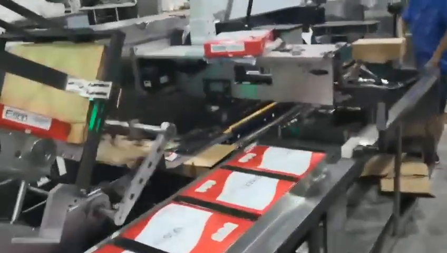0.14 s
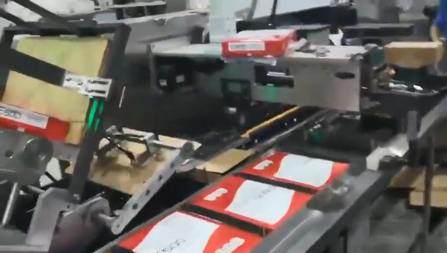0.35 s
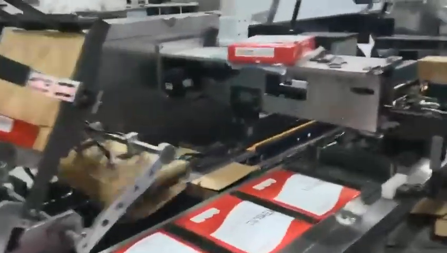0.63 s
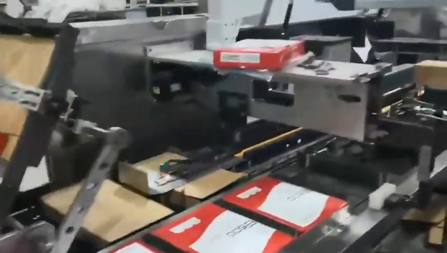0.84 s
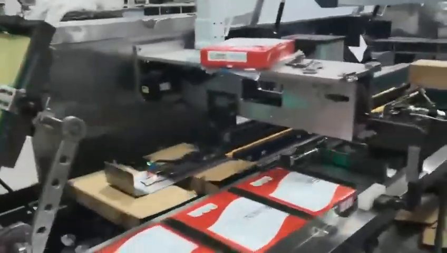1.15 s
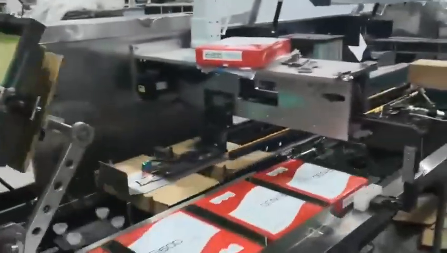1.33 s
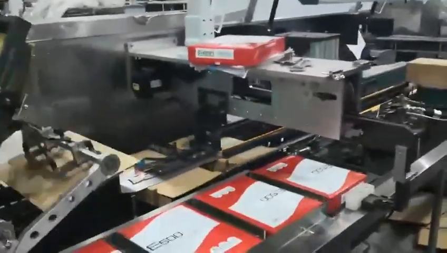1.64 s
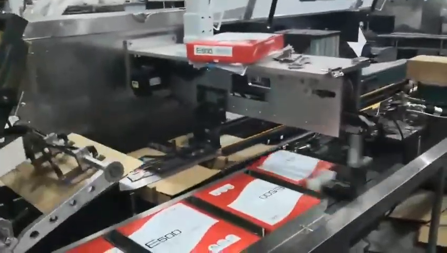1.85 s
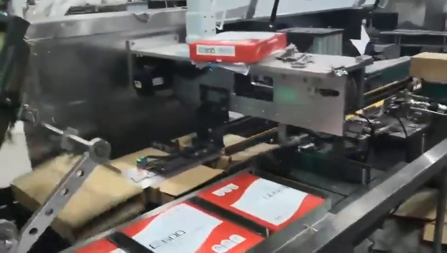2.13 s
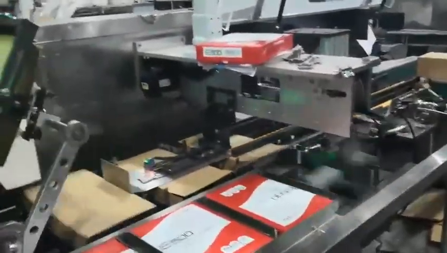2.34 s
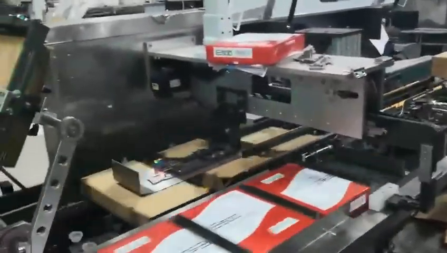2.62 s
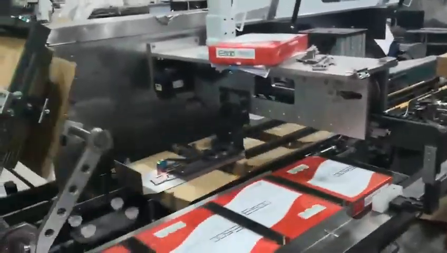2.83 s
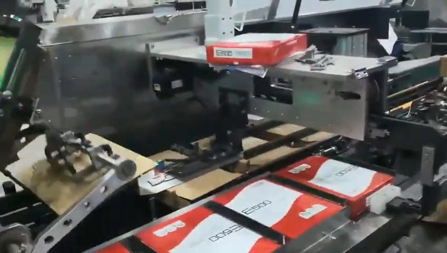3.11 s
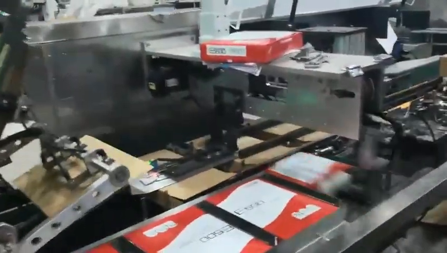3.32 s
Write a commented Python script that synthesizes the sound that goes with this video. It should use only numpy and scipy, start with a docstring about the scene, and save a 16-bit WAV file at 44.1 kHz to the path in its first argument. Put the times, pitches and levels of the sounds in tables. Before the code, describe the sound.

A carton packaging machine cycles close by over a steady factory hum. Whistling air bursts, each with a metallic knock, come at about 0.1, 1.6 and 3 seconds. Ringing lever clacks and low thumps follow from 0.6 to 1.1 seconds, from 2 to 2.7, and at 3.4. The conveyor rumbles louder while a carton scrapes along and knocks into place around 1.2 and 2.6 seconds.

```python
"""A factory hall hums while a cartoning machine hisses, thumps and clacks through two and a half cycles.
In each cycle the suction cups puff, and their arm vents a whistling jet of air and hits its stop.
The drive thumps the frame, metal levers ring under impact, and the conveyor rumbles on
while a carton scrapes along the rails and is knocked into place."""
import sys
import numpy as np
from scipy import signal
from scipy.fft import rfft, irfft, next_fast_len
from scipy.io import wavfile

SR = 44100
rng = np.random.default_rng(int(sys.argv[2]) if len(sys.argv) > 2 else 0)


def transcribe(signal):
    """Save signal, clipped to [-1, 1], as a 16-bit WAV file at the path in sys.argv[1]."""
    frames = np.atleast_2d(signal).T
    limited = np.clip(frames, -1, 1)
    pcm = np.round(limited * 32767).astype(np.int16)
    wavfile.write(sys.argv[1], SR, pcm)


N = 153027

# Balance of a machine standing to the right: frequency_hz, lean_db (left minus right)
MACHINE_SIDE = [(150, 0.5), (400, -2), (600, -3), (1000, -1), (1650, -8), (2350, -8), (4340, -5),
                (7000, -3), (8200, 4.5), (14000, -2.5)]
# Balance of valves and levers, the highest treble to the left: frequency_hz, lean_db
BRIGHT_SIDE = [(300, 0), (1000, 4), (1650, -3), (2600, -2.5), (5000, 3), (7000, -1.5), (8200, 6),
               (14000, 1)]
# Lever impacts, and a carton tap at 1.108 s voiced the same way: start_s, level_db, treble_db, lean_db,
# focus_hz
LEVER_HITS = [(0.611, -36, 0, 5, 7700), (0.631, -7, 1, -1, 1300), (0.659, -15.5, 1, 4, 1200),
              (0.806, -16, -28, 0, 1550), (0.875, -12, -8.5, -1, 1360), (0.944, -19, -19, -15, 1510),
              (1.108, -17.5, 6, 5.5, 453), (2.026, -20, -21, -3, 1620), (2.043, -10, 1.5, -6, 1630),
              (2.296, -15, -10, 0.5, 1550), (2.33, -18.5, -21, 5, 484), (2.37, -17.5, -16, 1, 1200),
              (2.531, -13.5, 1, 1, 1055), (2.574, -15.5, -23, 4, 1150), (2.676, -18.5, -21, -1, 1500),
              (3.42, -19, 4, -1, 1160), (3.448, -17.5, -19, 2, 1070), (3.4675, -6, -6, 10, 1480)]


def amp(db):
    """Amplitude grows tenfold every 20 decibels."""
    return 10 ** (np.asarray(db) / 20)


def unit(x):
    """Normalisation to rms 1."""
    return x / np.sqrt(np.mean(x ** 2) + 1e-20)


def read(points, hz):
    """Interpolation on a log-frequency axis."""
    f, value = np.transpose(points)
    return np.interp(np.log(hz + 1), np.log(f + 1), value)


def add(mix, start_s, sound):
    """Superposition of a sound on the mix."""
    part = mix[:, max(round(start_s * SR), 0):][:, :sound.shape[1]]
    part += sound[:, :part.shape[1]]


def pan(lean_db):
    """Level difference between the ears at constant power."""
    gains = amp(np.array([lean_db, -lean_db]).reshape(2, -1) / 2)
    return gains / np.sqrt(np.mean(gains ** 2, axis=0))


def favour(hz, focus_hz, boost_db=7.5, width_octaves=0.089):
    """Selective excitation: a blow favours one note of the struck part."""
    return amp(boost_db * np.exp(-(np.log2((hz + 1) / focus_hz) / width_octaves) ** 2))


def noise(colour, size, lean=None, treble_db=0, focus_hz=None):
    """Partially coherent stereo noise, most alike at the two ears in the bass."""
    # Likeness of left and right: frequency_hz, coherence
    likeness = [(60, 1), (140, 0.95), (300, 0.87), (420, 0.63), (540, 0), (700, 0.46), (880, 0),
                (1150, 0.5), (1550, 0.01), (1750, 0.74), (2200, 0.1), (2700, 0.01), (12000, 0)]
    # Phase lead of the left ear: frequency_hz, lead_rad
    lead = [(120, 0), (220, .1), (380, -.1), (700, 2.9), (1000, 5.8), (1400, 7), (1650, 6.7), (2050, 3.9),
            (2800, 2), (4000, 0)]
    hz = np.fft.rfftfreq(size, 1 / SR)
    common, separate = rfft(rng.standard_normal((2, size)))
    coherence = np.clip(read(likeness, hz), -1, 1)
    left = common * np.exp(1j * read(lead, hz))
    right = coherence * common + np.sqrt(1 - coherence ** 2) * separate
    spectrum = np.array([left, right]) * amp(read(colour, hz))
    if lean is not None:
        spectrum *= pan(read(lean, hz))
    if focus_hz:
        spectrum *= favour(hz, focus_hz)
    shelf = amp(treble_db / (1 + (3600 / (hz + 1)) ** 4))
    return irfft(spectrum * shelf, size) / irfft(spectrum, size).std()


def waver(size, rate_hz):
    """Random modulation: low-passed noise of rms about 1."""
    coarse = rng.standard_normal(SR * 4 // 16)
    hz = np.fft.rfftfreq(len(coarse), 16 / SR)
    slow = unit(irfft(rfft(coarse) * np.exp(-(hz / rate_hz) ** 2), len(coarse)))
    return np.interp(np.arange(size) / 16, np.arange(len(slow)), slow)


def resonance(hz, width_hz, size):
    """A narrow resonance under random forcing gives a tone that drifts in amplitude and phase."""
    drift = np.array([waver(size, width_hz) + 1j * waver(size, width_hz) for _ in range(2)])
    carrier = np.exp(2j * np.pi * np.cumsum(np.full(size, hz)) / SR)
    return unit((drift / abs(drift) ** 0.72 * carrier).real)


def each_cycle(curve, cycle_s=1.412):
    """Periodic modulation: a level curve repeats with the machine cycle."""
    # Load of each cycle: level_db
    loads = [-2.5, -2.5, -0.5]
    t = np.arange(N) / SR
    load_db = np.take(loads, (t / cycle_s).astype(int), mode="clip")
    return amp(load_db + np.interp(t % cycle_s, *np.transpose(curve)))


def blows(hits, colour, modes, crack_s, ring_db, wash_db, wash_s, ring_focus=1):
    """Impact excitation: a short crack, freely decaying modes and a duller wash of reflections."""
    out, t = np.zeros((2, N)), np.arange(SR // 2) / SR
    attack = 1 - np.exp(-t / .0004)
    for start_s, level_db, treble_db, lean_db, focus_hz in hits:
        crack = np.exp(-t / crack_s) * noise(colour, len(t), BRIGHT_SIDE, treble_db, focus_hz)
        wash = noise(colour, len(t), BRIGHT_SIDE, treble_db - 5, focus_hz)
        wash *= amp(wash_db) * np.exp(-t / wash_s)
        ring = 0
        for hz, db, t60_s in modes:
            decay = amp(ring_db + db + rng.standard_normal() - 60 * t / t60_s)
            swing = np.sin(2 * np.pi * (hz * t + rng.random((2, 1))))
            ring += favour(hz, focus_hz) ** ring_focus * decay * swing
        add(out, start_s, amp(level_db) * pan(lean_db) * attack * (crack + wash + ring))
    return out


def hall():
    """Broadband factory roar underlies motor tones that waver in amplitude and phase."""
    # Roar spectrum: frequency_hz, density_db
    roar = [(25, -12), (55, -1.5), (90, 0.5), (150, -5.5), (220, -3), (330, -5), (480, -10.5), (700, -13),
            (1100, -6), (1700, -4.5), (2600, -4), (3300, -10), (4400, -15), (6000, -17), (7500, -17),
            (15000, -29)]
    # Motor hum and gear whine: pitch_hz, level_db
    motors = [(100, -56), (150, -47.5), (216, -47.5), (1081, -59), (1648, -50), (2143, -53), (2831, -58.5)]
    t = np.arange(N) / SR
    out = amp(-29.5 + 0.94 * waver(N, 40)) * noise(roar, N, MACHINE_SIDE)
    for hz, db in motors:
        gain = pan(read(MACHINE_SIDE, hz)) * np.sqrt(2) * amp(db + 2.2 * waver(N, 8))
        out += gain * np.sin(2 * np.pi * hz * t + 1.02 * waver(N, 5))
    return out


def drone(pitch_hz=304.6, length_s=0.318, fade_s=0.016):
    """A narrow resonance sounds briefly at the start as a low tone."""
    out, t = np.zeros((2, N)), np.arange(round(length_s * SR)) / SR
    gate = np.clip(np.minimum(t, t[-1] - t) / fade_s, 0, 1)
    add(out, 0, amp(-39) * pan(0) * gate * resonance(pitch_hz, 12, len(t))[0])
    return out


def conveyor(ticks_per_s=57, tick_fall_s=0.0062):
    """Drive tones, chain rumble and link impacts follow the load; sliding friction makes card hiss."""
    # Conveyor effort and carton sliding through one cycle: time_s, level_db
    effort = [(0, -11), (.14, -12), (.3, -10.5), (.45, -24), (.78, -19.5), (.9, 0), (1.02, -4),
              (1.15, -1.5), (1.29, -5.5), (1.36, -7.5), (1.418, -11)]
    sliding = [(0, -44), (.09, -9), (.16, -7), (.45, -9), (.93, -9), (1.01, -12.5), (1.1, 0), (1.165, -0.5),
               (1.27, -4.5), (1.35, -14), (1.418, -9)]
    # Spectra of chain, links and cardboard: frequency_hz, density_db
    chain = [(30, -20), (60, -11), (88, 4), (120, 3.5), (160, 2.5), (220, -3), (300, -5.5), (450, -6.5),
             (700, -11), (1200, -15.5), (2000, -23), (3500, -52), (8000, -69)]
    link = [(200, -17), (450, -19), (700, 17), (1300, 7), (2400, -17), (4000, -20), (8000, -31),
            (15000, -18)]
    card = [(300, -27.5), (800, 4), (1400, 10), (2400, 17.5), (4000, 3), (5500, 13), (7500, 11),
            (15000, 2.5)]
    # Tones of the loaded drive: pitch_hz, level_db
    tones = [(86, -32.5), (152, -30), (218, -40), (254, -34)]
    rumble = amp(-22 + 2.5 * waver(N, 17.5)) * noise(chain, N, MACHINE_SIDE)
    drive = sum(amp(db) * resonance(hz, 11.3, N)[0] for hz, db in tones)
    hits = (rng.random(N) < ticks_per_s / SR) * np.minimum(rng.exponential(1, N), 2)
    decays = unit(signal.lfilter([1], [1, -np.exp(-1 / (tick_fall_s * SR))], hits))
    ticks = amp(-40.5) * decays * noise(link, N, MACHINE_SIDE)
    scrape = amp(-27.5 + 3.4 * waver(N, 92)) * noise(card, N, MACHINE_SIDE)
    return each_cycle(effort) * (rumble + drive + ticks) + each_cycle(sliding) * scrape


def suction_puffs(rise_s=0.025, fall_s=0.028):
    """Turbulence in the air drawn by the cups makes soft, very high hisses."""
    # Intakes of air: start_s, length_s, level_db
    puffs = [(0.062, .1, -27), (0.963, 0.092, -28), (1.486, .1, -30), (2.366, 0.15, -28), (2.902, .09, -38)]
    # Hiss spectrum: frequency_hz, density_db
    hiss = [(2000, -34), (5000, -19), (7000, -9), (8300, 0), (9400, 13), (10500, 0), (11500, -7),
            (15000, -8)]
    out, t = np.zeros((2, N)), np.arange(SR // 2) / SR
    for start_s, length_s, level_db in puffs:
        flow = np.minimum(t / rise_s, 1) * np.exp(-np.maximum(t - length_s, 0) / fall_s)
        add(out, start_s, amp(level_db) * flow * noise(hiss, len(t)))
    return out


def carton_skitters(skips_per_s=330, centre_hz=1456, ring_s=0.0027, fall_s=0.042):
    """Intermittent contact: the carton's edge skips on the rail in tiny hits that grow until it seats."""
    # Runs of skips: start_s, peak_s, level_db
    runs = [(1.111, 1.183, -18), (2.53, 2.606, -21)]
    out, t = np.zeros((2, N)), np.arange(SR // 40) / SR
    for start_s, peak_s, level_db in runs:
        times = start_s + np.cumsum(rng.exponential(1 / skips_per_s, size=80))
        for s, (note, force, *phases) in zip(times, rng.standard_normal((len(times), 4))):
            swell = amp(-9 * max(peak_s - s, 0) / (peak_s - start_s))
            fade = np.exp(-max(s - peak_s, 0) / fall_s)
            hz = centre_hz * 2 ** (0.247 * note)
            ring = np.sin(2 * np.pi * hz * t + np.c_[phases]) * np.exp(-t / ring_s)
            add(out, s, amp(level_db + 3 * force) * swell * fade * pan(-3) * ring)
    return out


def carton_knocks():
    """Knocking the carton into place excites the modes of the guide rail."""
    # Carton impacts: start_s, level_db, treble_db, lean_db, focus_hz
    hits = [(1.15, -23, -9, -5, 1720), (1.187, -19, -1, -6.5, 1566), (1.196, -22, -11, -9, 1240),
            (1.202, -22.5, -12, -1, 1400), (2.611, -21, 8, -1.5, 1625), (2.619, -23.5, -5, -4, 1430),
            (2.625, -24.5, -8, -11, 1530)]
    # Knock spectrum: frequency_hz, density_db
    colour = [(150, -23), (700, -45), (1100, 8), (1500, -4), (2100, -3), (3000, -5.5), (4500, -11),
              (7500, -23), (15000, -46)]
    # Rail modes: pitch_hz, level_db, t60_s
    modes = [(1176, -8, 0.26), (1207, 0.5, 0.14), (1370, -2, 0.12), (1495, 16.5, 0.024), (1657, 1, 0.17),
             (2200, -1.5, 0.16)]
    return blows(hits, colour, modes, crack_s=0.0088, ring_db=-4, wash_db=-8, wash_s=0.072)


def drive_thumps(rise_s=0.01, boom_s=0.11, hum_s=0.17, hum_hz=151.3):
    """A soft shove excites the frame's low modes: a few swings, then a boom that narrows to a hum."""
    # Shoves of the drive: peak_s, level_db, pitch_hz, half_length_s, boom_db
    shoves = [(0.553, -8, 158.5, 0.0056, -14.5), (0.598, -14.5, 155, 0.0051, -9),
              (0.88, -7.5, 175, 0.0089, -18.5), (1.979, -11, 154, 0.0055, -10),
              (2.03, -15, 191, 0.0053, -12.5), (2.3, -6.5, 162, 0.0075, -10.5),
              (2.346, -20, 146, 0.011, -9), (2.498, -19, 218, 0.012, -10.5),
              (3.402, -8.5, 137, 0.0046, -14), (3.441, -13.5, 150, 0.0076, -13)]
    # Boom spectrum: frequency_hz, density_db
    frame = [(30, -27), (60, -11), (90, -6.5), (160, 3), (220, 0), (290, -11.5), (500, -19), (900, -28),
             (3000, -74)]
    out, t = np.zeros((2, N)), np.arange(SR) / SR
    for peak_s, level_db, hz, half_s, boom_db in shoves:
        from_peak = np.arange(N) / SR - peak_s
        out += amp(level_db) * np.exp(-(from_peak / half_s) ** 2) * np.cos(2 * np.pi * hz * from_peak)
        boom = amp(boom_db) * np.exp(-t / boom_s) * noise(frame, len(t))
        hum = amp(-17.5) * np.exp(-t / hum_s) * resonance(hum_hz, 8.1, len(t))[0]
        add(out, peak_s, amp(level_db) * np.minimum(t / rise_s, 1) * (boom + hum))
    return out


def lever_clacks():
    """Struck metal levers ring in inharmonic modes."""
    # Clack spectrum: frequency_hz, density_db
    colour = [(100, -20), (300, -4.5), (650, 0), (1000, 2.5), (1400, 2.5), (2000, 2), (2700, -1),
              (3800, -8.5), (5500, -12.5), (7500, -2), (15000, -16)]
    # Lever modes: pitch_hz, level_db, t60_s
    modes = [(1015, -13, 0.15), (1428, -2.5, 0.18), (2447, -0.5, 0.16), (2680, -18, 0.11), (5570, -26, .1),
             (7400, -23, 0.038)]
    return blows(LEVER_HITS, colour, modes, crack_s=0.0057, ring_db=-12.5, wash_db=-11.5, wash_s=0.068)


def lever_snaps(fall_s=0.004):
    """Brief contact has a wide spectrum: each clack opens with a bright snap of metal on metal."""
    # Contact spectrum: frequency_hz, density_db
    contact = [(2500, -19), (4500, -1), (5600, -3), (7500, -13.5), (15000, -3.5)]
    out, t = np.zeros((2, N)), np.arange(SR // 20) / SR
    for start_s, level_db, treble_db, lean_db, _ in LEVER_HITS:
        snap = np.exp(-t / fall_s) * noise(contact, len(t))
        add(out, start_s, amp(level_db + treble_db - 9) * pan(lean_db) * snap)
    return out


def arm_stops():
    """The arm hits its stop and rings on in lightly damped modes."""
    # Arm impacts: start_s, level_db, treble_db, lean_db, focus_hz
    hits = [(0.171, -12.5, 3.5, -1.5, 1083), (0.187, -17, -5, -7, 315), (1.602, -13.5, -2.5, -1, 453),
            (1.611, -13, -4, -8.5, 2070), (3.021, -11.5, -7, -2, 1780)]
    # Impact spectrum: frequency_hz, density_db
    colour = [(60, -36), (130, -26), (250, 7.5), (360, 7), (560, 9), (800, 4), (1100, 4.5), (1400, 1.5),
              (2200, 13), (3000, 7), (4200, 0), (6500, 12), (8500, 8), (15000, -7)]
    # Arm modes: pitch_hz, level_db, t60_s
    modes = [(292, -27, 0.11), (525, -18, 0.07), (1089, -5, 0.2), (1540, -9, .3), (1790, -10.5, 0.11),
             (2243, -9, 0.49), (2264, -2, 0.13), (2823, -7, 0.74)]
    return blows(hits, colour, modes, crack_s=0.0073, ring_db=-10, wash_db=-5.5, wash_s=0.079,
                 ring_focus=1.62)


def air_vents(leak_s=0.027, rise_s=0.0099, hold_s=0.036, fall_s=0.02, shut_s=0.012):
    """A turbulent jet drives resonances: a leak swells, bursts into a shriek and bleeds until shut off."""
    # Valve openings: start_s, level_db, length_s, lean_db, whistle_hz, bleed_db, bleed_fall_s,
    # hoot_hz, hoot_db
    vents = [(0.137, -18.5, .337, -3, 5710, -8.5, 0.19, 3280, -10),
             (1.565, -15.5, 0.35, -2.5, 5660, -11, 0.18, 2954, -17.5),
             (2.982, -15.5, 0.3, -4, 5805, -11, 0.13, 2960, -14.5)]
    # Jet spectrum: frequency_hz, density_db
    air = [(300, -21), (1000, -54), (2500, 14), (4300, -1), (5200, 13), (6000, 23.5), (7200, -14),
           (8300, 20), (15000, 4)]
    # Exhaust resonances: pitch_hz, width_hz, level_db
    exhaust = [(2055, 150, -17), (2816, 120, -14), (6730, 340, -15)]
    out, size = np.zeros((2, N)), SR // 2
    t, before = np.arange(size) / SR, np.arange(-(SR // 8), 0) / SR
    opening, after = np.minimum(t / rise_s, 1), np.maximum(t - hold_s, 0)
    burst = opening * np.exp(-after / fall_s)
    for start_s, level_db, length_s, lean_db, whistle_hz, bleed_db, bleed_s, hoot_hz, hoot_db in vents:
        leak = amp(level_db - 11.5) * np.exp(before / leak_s) * noise(air, len(before))
        add(out, start_s + before[0] + rise_s / 2, leak)
        bleed = opening * amp(bleed_db) * np.exp(-after / bleed_s - np.maximum(t - length_s, 0) / shut_s)
        hz = whistle_hz + 704 * np.exp(-t / 0.00637)  # quick downward chirp
        whistle = burst * resonance(hz, 180, size) + bleed * resonance(hz - 35, 95, size)
        whistle *= amp(0.5 * waver(size, 56))  # flutter
        whistle += amp(-14.5) * burst * resonance(2 * hz, 360, size)
        pipe = sum(amp(db) * resonance(pipe_hz, width_hz, size) for pipe_hz, width_hz, db in exhaust)
        hoot = amp(hoot_db) * burst * resonance(hoot_hz, 110, size)
        rush = np.hypot(burst, bleed) * (pipe + amp(-4) * noise(air, size, BRIGHT_SIDE))
        add(out, start_s, amp(level_db) * (pan(lean_db) * whistle + hoot + rush))
    return out


def scene():
    """The sound pressures of hall and machine add linearly."""
    background = hall() + drone()
    arm = suction_puffs() + air_vents() + arm_stops()
    levers = lever_clacks() + lever_snaps()
    carton = carton_knocks() + carton_skitters()
    return background + arm + levers + carton + drive_thumps() + conveyor()


def record(dry, full_scale=0.92, edge_hz=15337):
    """A small microphone dulls the top octave, clips at full scale and limits the band."""
    # Microphone response: frequency_hz, gain_db
    response = [(7700, 1), (8300, -9.5), (9000, -25.5), (10000, -27.5), (11300, -17.5), (12500, -21.5),
                (15000, -20)]
    size = next_fast_len(N + 4096)
    gain = amp(read(response, np.fft.rfftfreq(size, 1 / SR)))
    dull = irfft(rfft(dry, size) * gain, size)[:, :N]
    lowpass = signal.firwin(511, edge_hz, window=("kaiser", 9), fs=SR)
    return signal.oaconvolve(np.clip(dull, -full_scale, full_scale), lowpass[None], "same")


dry = scene()
out = record(dry)
transcribe(out)
```